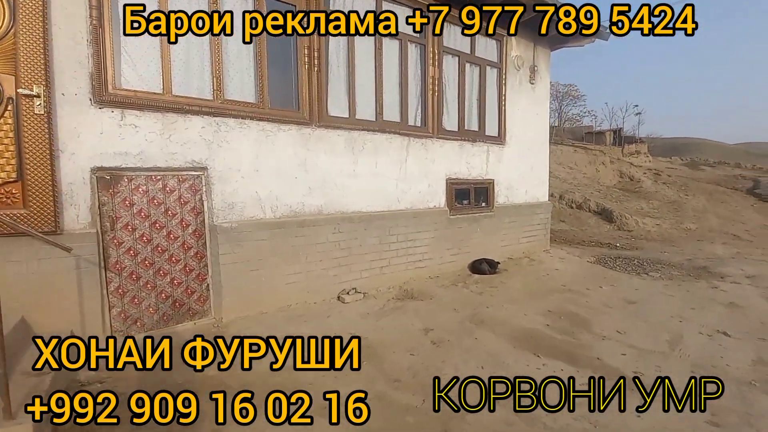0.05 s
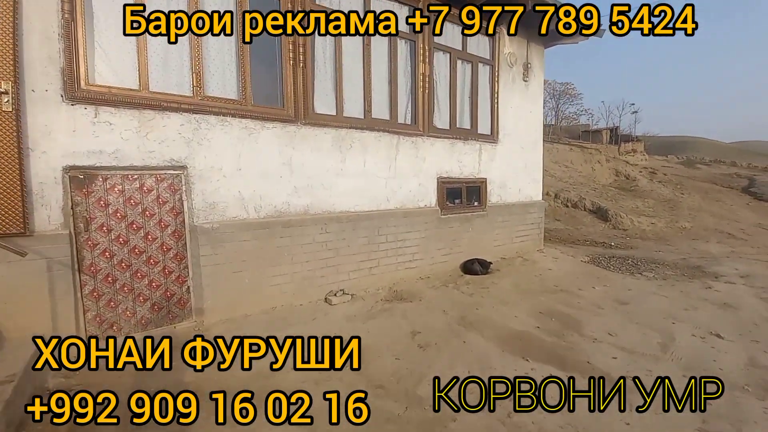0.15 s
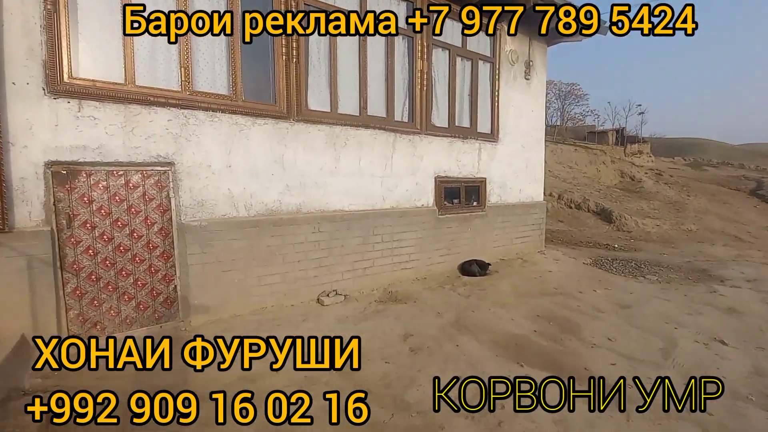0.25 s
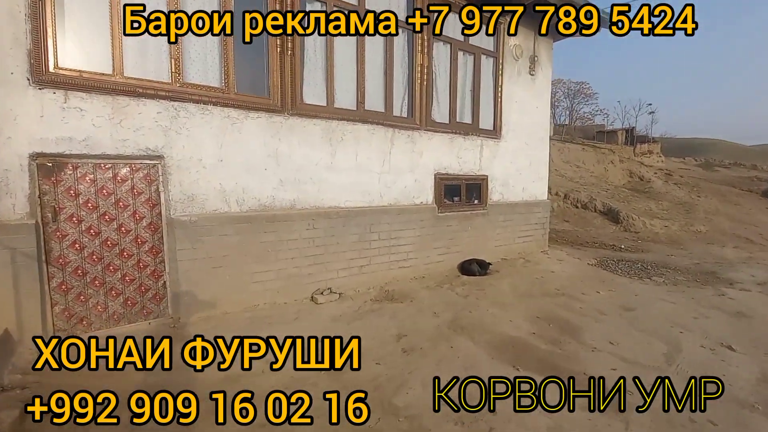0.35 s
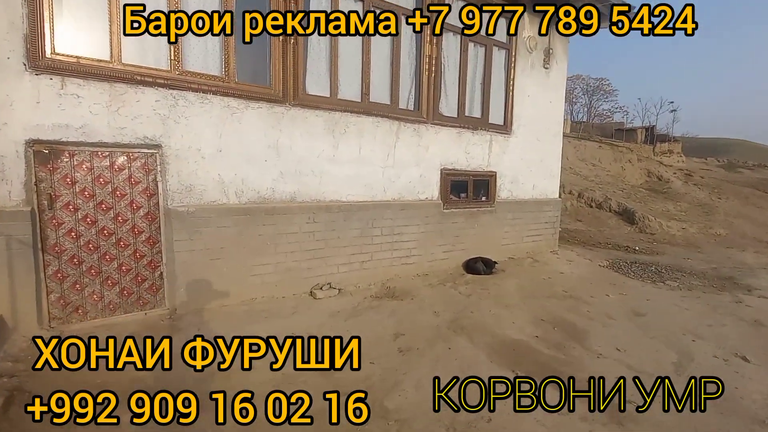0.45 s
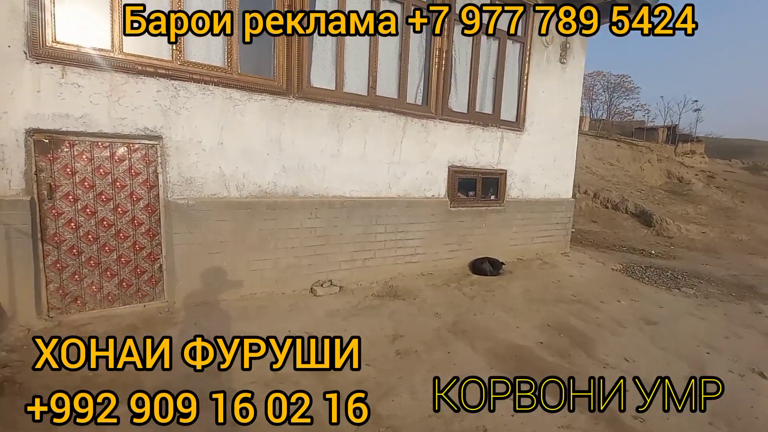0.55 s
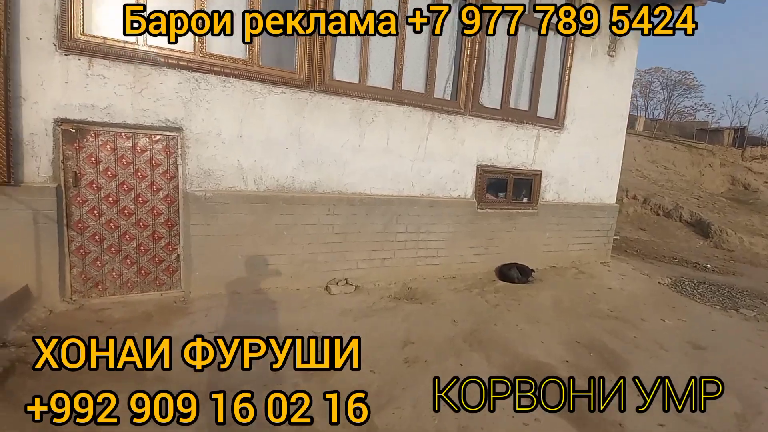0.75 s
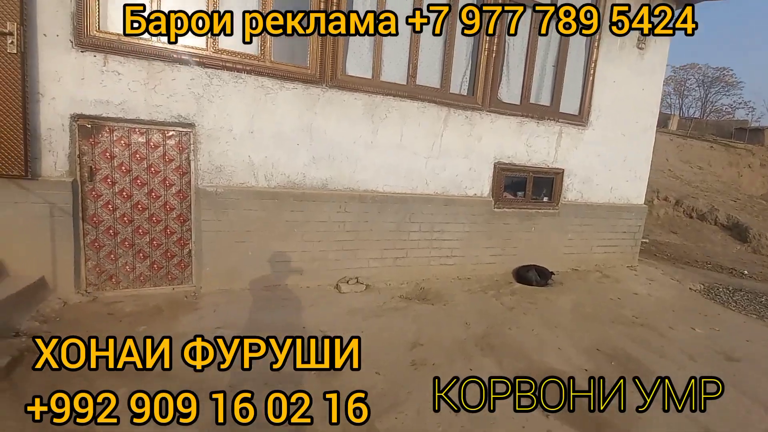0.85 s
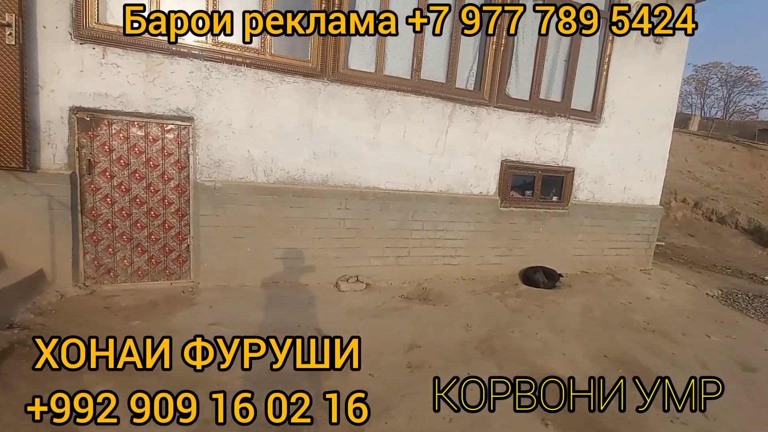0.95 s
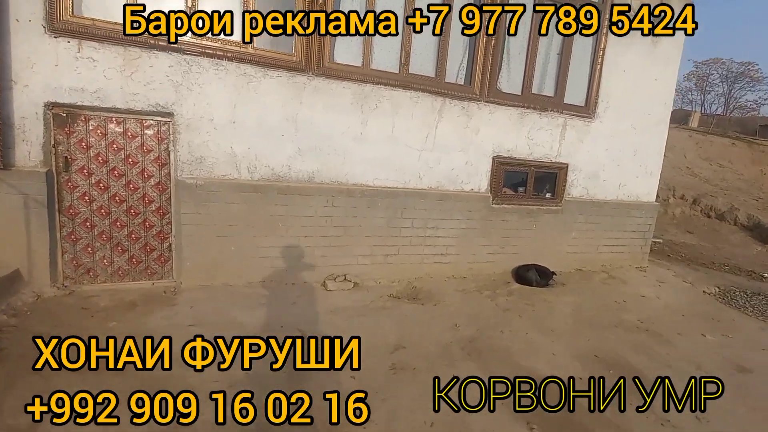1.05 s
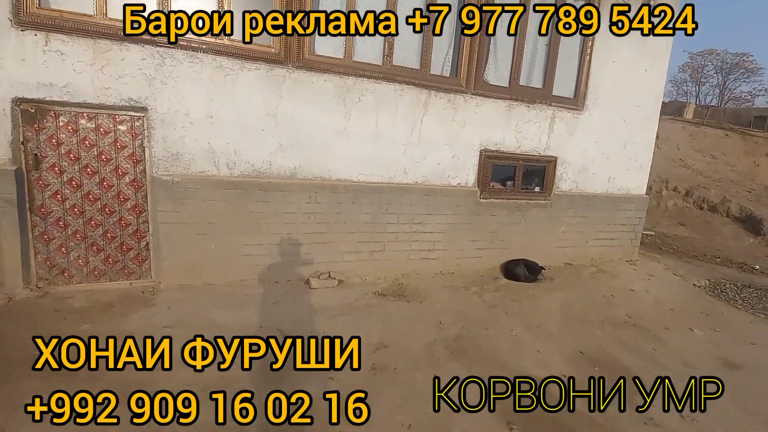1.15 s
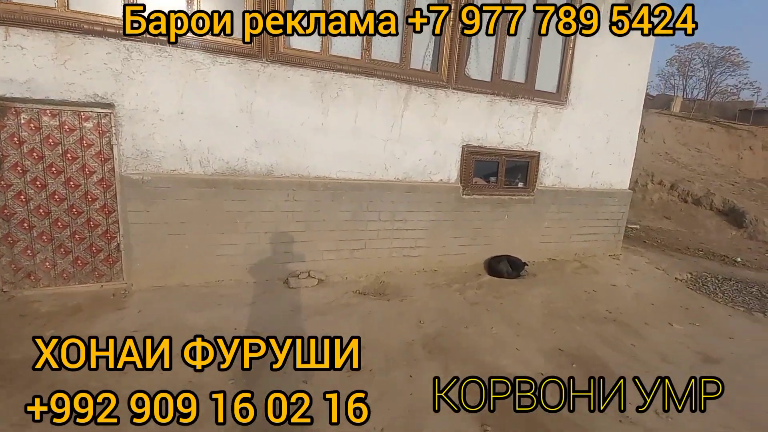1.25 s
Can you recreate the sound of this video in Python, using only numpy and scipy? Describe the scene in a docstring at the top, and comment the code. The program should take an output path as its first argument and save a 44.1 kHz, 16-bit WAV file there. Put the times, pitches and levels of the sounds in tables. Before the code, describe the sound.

Two slow, soft footsteps on packed dirt outdoors, with low muffled thuds from the jolted handheld camera

```python
"""Two slow steps on packed dirt

A quiet yard, heard through the two microphone ports of a camera in the walker's hand.
Close: dull heel knocks from decaying modes and noise, soles scuffing dust as shaped noise, grain snaps,
a dry rustle, sagging low thuds of the jolted camera and squeaks from one very high wavering tone.
Low noise makes the air rumble, mostly on the left port; far off are arching bird whistles, murmur and hiss."""
import sys
import numpy as np
from scipy import signal
from scipy.fft import rfft, irfft
from scipy.io import wavfile
from scipy.ndimage import uniform_filter1d

SR = 44100
rng = np.random.default_rng(int(sys.argv[2]) if len(sys.argv) > 2 else 0)


def master(y):
    """Save y as 16-bit WAV."""
    cut = np.clip(np.atleast_2d(y).T, -1, 1)
    pcm = np.round(cut * 32767)  # scale
    wavfile.write(sys.argv[1], SR, pcm.astype(np.int16))


N = 57330  # samples, 1.3 s

# In every table, pan_db is left over right. Colour levels are relative: each coloured noise is set to rms 1.

# Heel knocks on earth: start_s, level_db (of the crunch), decay_s (of the crunch)
HEEL_KNOCKS = [(0.310, -50, 0.036), (0.44, -48.5, .007), (0.926, -51, 0.023)]
# Spectrum of the heel crunch: frequency_hz, level_db
CRUNCH_COLOUR = [(50, -26), (110, 0), (220, 3), (330, -6), (520, -0.5), (800, -28.5), (1500, -22),
                 (2500, -44), (6000, -40), (15000, -61)]
# Dead modes of sole and earth: pitch_hz, level_db (within the thump), decay_s
SOLE_MODES = [(178.5, -4, 0.022), (267, 0, 0.0068), (506, -3.5, 0.0038)]
HEEL_ATTACK_S, HEEL_PAN_DB = 0.0023, 3
THUMP_OVER_CRUNCH_DB = 6

# Soles sliding over dust: start_s, rise_s, hold_s, release_s, level_db, pan_db
SOLE_SLIDES = [(0.065, 0.13, 0.024, 0.12, -68.5, 0.5), (0.297, .06, 0.097, 0.069, -67, 5),
               (0.594, 0.018, 0.021, 0.027, -66, 9.5), (0.763, 0.037, 0.18, 0.017, -60.5, 3),
               (0.799, .12, 0.026, 0.014, -56, .5)]
# Spectrum of the rubbing sole: frequency_hz, level_db
RUB_COLOUR = [(200, -10.5), (300, -10), (450, -13.5), (580, -1), (700, -9), (850, -10.5), (1050, -10.5),
              (1200, -3.5), (1340, 4), (1460, -4), (1750, -6.5), (2100, -18), (2650, -29.5), (4000, -38.5),
              (5800, -21), (8000, -38), (10400, -35), (12100, -29), (15500, -35.5)]
RUB_CUT_HZ, RUB_LIKENESS = 170, 0.88
GRIT_PER_S, GRIT_OVER_RUB_DB = 3100, -14.5
GRIT_SPREAD_DB = 4  # mean of the random boost of each grain

# Single grains cracking under the sole: start_s, level_db
GRAIN_TICKS = [(0.267, -65), (0.312, -62), (0.4225, -61), (0.93, -55.5), (0.943, -64), (1.018, -76),
               (1.025, -78), (1.044, -63.5)]
# Spectrum of a cracking grain: frequency_hz, level_db
GRAIN_COLOUR = [(2000, -15.5), (4000, -9), (6200, 13.5), (8500, -6.5), (12500, 2.5), (15500, -9)]
TICK_DECAY_S = 0.0023

# Level of a soft dry rustle, likely clothing: time_s, level_db
CLOTH_LEVEL = [(0, -74), (0.14, -69), (0.25, -64), (0.47, -63), (0.55, -77.5), (0.73, -74), (0.8, -71.5),
               (0.95, -76.5), (1.0, -67.5), (1.15, -67), (1.3, -64.5)]
# Spectrum of that rustle: frequency_hz, level_db
FABRIC_COLOUR = [(300, -18), (450, -7), (620, -0.5), (800, -14.5), (1050, -12), (1400, -1), (1900, -4.5),
                 (2300, -18.5), (3200, -30), (6000, -25.5), (9000, -41.5)]
CLOTH_PAN_DB = 7.5

# Thuds of the jolted camera: start_s, level_db, pitch_hz (at onset), decay_s, pan_db
CAMERA_THUDS = [(0.045, -38, 84.5, 0.0088, 15), (0.123, -36.5, 104, 0.0033, 10.5),
                (0.155, -39, 81, 0.004, -17), (0.194, -35.5, 95, 0.0068, 43), (0.234, -41, 92, 0.0055, -25),
                (0.313, -36, 109.4, 0.004, 9), (0.3576, -20.5, 140, 0.0055, 28),
                (0.392, -23, 107, 0.0038, 26), (0.421, -23.5, 183, 0.0033, 33),
                (0.452, -29.5, 144, 0.0024, 29), (0.465, -37, 87, 0.0039, -4),
                (0.501, -39.5, 126, 0.0031, 7.5), (0.62, -40, 132, 0.0038, 24),
                (0.947, -33.5, 90.6, 0.0092, 36)]
# Spectrum of the grip rustle inside a thud: frequency_hz, level_db
GRIP_COLOUR = [(120, 2.5), (200, 6), (320, -1.5), (480, -6.5), (800, -30), (2000, -60)]
THUD_REST_HZ, THUD_SAG_S = 76.8, 0.014
GRIP_OVER_THUD_DB = -24

# Tiny squeaks of the hand-held case: start_s, length_s, level_db, pan_db
CASE_SQUEAKS = [(0.268, 0.0039, -64, -20), (0.423, 0.0064, -68, -16), (0.4437, 0.01, -48.5, -10.5),
                (0.459, 0.023, -64.5, 13), (0.828, 0.027, -69.5, -27), (1.016, 0.019, -69, -3)]
SQUEAK_HZ, SQUEAK_DRIFT_HZ = 11950, 46.2  # centre and spread of the pitch
SQUEAK_ROUGHNESS = 0.21  # spread of the amplitude, as a fraction

# Level of moving air on the left port: time_s, level_db
AIR_LEVEL = [(0, -63.5), (0.05, -53), (0.11, -49), (0.29, -52.5), (0.35, -41), (0.48, -41.5), (0.55, -50),
             (0.74, -49), (0.92, -44), (1.07, -49.5), (1.11, -56), (1.3, -63.5)]
# Spectrum of the air rumble: frequency_hz, level_db
RUMBLE_COLOUR = [(25, -21), (45, -15.5), (62, -1.5), (78, -1.5), (105, -3), (160, -15.5), (260, -20.5),
                 (400, -40), (800, -44), (2000, -83)]
AIR_CUT_HZ, AIR_RIGHT_DB = 18, -16.5  # right port relative to left

# Far bird whistles: middle_s, length_s, top_pitch_hz (before waver), level_db
BIRD_WHISTLES = [(0.727, 0.077, 3070, -74), (1.237, 0.096, 3090, -82.5), (1.257, 0.085, 3900, -83)]
BIRD_ARCH_HZ, BIRD_WAVER_HZ = 378, 20
BIRD_PAN_DB = -4

# Spectrum of the open-air murmur: frequency_hz, level_db
MURMUR_COLOUR = [(88, -35), (150, -1), (179, -14), (201, -7), (230, -6), (302, -19.5), (359, -18.5),
                 (490, -43.5), (561, -15), (656, -20.5), (966, -32.5), (1200, -19.5), (1290, -22),
                 (1400, -22.5), (2020, -42), (2140, -52.5), (2980, -41), (3760, -44.5), (6600, -38),
                 (7560, -56), (15500, -51)]
MURMUR_DB, MURMUR_WALK_DB, MURMUR_PAN_DB = -68.5, 1.03, 1
MURMUR_CUT_HZ, MURMUR_LIKENESS = 218, 0.66
# Level of the high hiss: time_s, level_db
HISS_LEVEL = [(0, -75), (0.3, -73.5), (0.49, -69), (0.58, -74), (0.75, -77), (0.87, -76), (0.95, -68.5),
              (1.06, -69), (1.17, -74), (1.3, -77.5)]
# Spectrum shared by the hiss and the loose grit: frequency_hz, level_db
TREBLE_COLOUR = [(2500, -10.5), (4600, -17), (5700, -4), (6500, -0.5), (7600, -12.5), (10000, -15.5),
                 (11400, -9.5), (12200, -3), (13500, -11), (15500, -6)]

PORT_LAG_S, PORT_BLEND_HZ = 0.00013, 2640  # the lag is halved at this frequency
LOW_CUT_HZ, TOP_HZ = 42, 15850


def undb(db):
    """Decibels to gain."""
    return 10 ** (np.asarray(db) / 20)


def unit(x):
    """Scale to rms 1."""
    return x / np.sqrt(np.mean(x ** 2))


def clock():
    """Time of every sample in seconds."""
    return np.arange(N) / SR


def curve(rows):
    """Gain along a table of time_s, level_db."""
    return undb(np.interp(clock(), *np.array(rows).T))


def pan(db):
    """Left and right gains; the louder side stays at 1."""
    return undb(np.minimum([[db], [-db]], 0))


def colour(x, points, cut_hz=20):
    """Give a signal a spectrum of frequency_hz, level_db points with a steep low cut, at rms 1."""
    f = np.arange(N // 2 + 1) * SR / N + 0.0011  # the offset avoids log(0)
    hz, db = np.array(points).T
    shape = undb(np.interp(np.log(f), np.log(hz), db))
    low_cut = np.hypot(1, np.square(np.square(cut_hz / f)))
    return unit(irfft(rfft(x) * shape / low_cut, N))


def pair(likeness):
    """Left and right noise that share this fraction of their power."""
    c = np.clip(likeness, 0, 1)
    shared = np.sqrt(c) * rng.standard_normal(N)
    return shared + np.sqrt(1 - c) * rng.standard_normal((2, N))


def walk(rate):
    """Slow chance with a spread of 1: random values held at this rate in Hz, then smoothed twice."""
    k = max(int(SR / rate), 1)
    held = rng.standard_normal(N)[np.arange(N) // k]
    return unit(uniform_filter1d(uniform_filter1d(held, k), k))


def heels():
    """A heel meets hard earth: dead modes give a dull thump, decaying noise a short crunch."""
    crunch = colour(pair(1.0), CRUNCH_COLOUR)
    out = 0
    for start, db, decay in HEEL_KNOCKS:
        age = np.maximum(clock() - start, 0)
        thump = 0
        for hz, mode_db, ring in SOLE_MODES:
            thump = thump + undb(mode_db) * np.sin(2 * np.pi * hz * age) * np.exp(-age / ring)
        attack = np.minimum(age / HEEL_ATTACK_S, 1)
        knock = crunch * np.exp(-age / decay) + undb(THUMP_OVER_CRUNCH_DB) * thump
        out = out + undb(db) * attack * knock
    return out * pan(HEEL_PAN_DB)


def scuffs():
    """A sole rubs harder, slides and stops; loose grains tick under it."""
    rub = colour(pair(RUB_LIKENESS), RUB_COLOUR, RUB_CUT_HZ) * undb(0.87 * walk(70.6))
    struck = rng.random(N) < GRIT_PER_S / SR
    boost = undb(GRIT_SPREAD_DB * rng.exponential(size=N))
    grains = struck * rng.standard_normal((2, N)) * boost
    sound = rub + undb(GRIT_OVER_RUB_DB) * colour(grains, TREBLE_COLOUR)
    power = 0  # overlapping slides add in power
    for start, rise, hold, release, db, side_db in SOLE_SLIDES:
        age = clock() - start
        swell = np.clip(age / rise, 0, 1)
        fade = np.exp(-np.maximum(age - rise - hold, 0) / release)
        power = power + (undb(db) * pan(side_db) * swell * fade) ** 2
    return sound * np.sqrt(power)


def ticks():
    """Bright snaps of single grains: noise that starts at once and dies exponentially."""
    env = 0
    for start, db in GRAIN_TICKS:
        age = clock() - start
        env = env + undb(db) * (age > 0) * np.exp(-np.abs(age) / TICK_DECAY_S)
    return colour(pair(0.15), GRAIN_COLOUR) * env


def cloth():
    """Soft dry rustle, likely clothing: fluttering noise swells and sinks along its level table."""
    rustle = colour(pair(0.48), FABRIC_COLOUR, 370)
    return rustle * curve(CLOTH_LEVEL) * undb(2.13 * walk(50)) * pan(CLOTH_PAN_DB)


def thuds():
    """Each jolt swells and dies as a low tone moving to a rest pitch, with a muffled rustle of the grip."""
    out = np.zeros((2, N))
    rustle = undb(GRIP_OVER_THUD_DB) * colour(rng.standard_normal(N), GRIP_COLOUR, 86)
    for start, db, hz, decay, side_db in CAMERA_THUDS:
        age = np.maximum(clock() - start, 0)
        pitch = THUD_REST_HZ + (hz - THUD_REST_HZ) * np.exp(-age / THUD_SAG_S)
        tone = np.sin(2 * np.pi * np.cumsum(pitch * (age > 0)) / SR)
        env = (age / (2 * decay)) ** 2 * np.exp(2 - age / decay)  # peaks at 1 after two decay times
        out += undb(db) * pan(side_db) * env * (tone + rustle)
    return out


def squeaks():
    """Brief slips excite one very high, slightly rough resonance."""
    pitch = SQUEAK_HZ + SQUEAK_DRIFT_HZ * walk(900)
    tone = np.sin(2 * np.pi * np.cumsum(pitch) / SR)
    tone = unit(tone * (1 + SQUEAK_ROUGHNESS * walk(500)))
    env = 0
    for start, length, db, side_db in CASE_SQUEAKS:
        swell = np.sin(np.pi * np.clip((clock() - start) / length, 0, 1))
        env = env + undb(db) * pan(side_db) * swell
    return tone * env


def air():
    """Eddies rumble on each port separately, evened out over a few cycles."""
    eddies = colour(rng.standard_normal((2, N)), RUMBLE_COLOUR, AIR_CUT_HZ)
    eddies = eddies / np.sqrt(uniform_filter1d(eddies ** 2, size=1500))  # 34 ms window
    return eddies * curve(AIR_LEVEL) * undb([[0], [AIR_RIGHT_DB]])


def bird():
    """Far whistles whose wavering pitch arches up and down."""
    out, waver = 0, BIRD_WAVER_HZ * walk(250)
    for middle, length, hz, db in BIRD_WHISTLES:
        u = np.clip(2 * (clock() - middle) / length, -1, 1)  # -1 at the start, 1 at the end
        pitch = hz + waver - BIRD_ARCH_HZ * u ** 2
        whistle = np.sin(2 * np.pi * np.cumsum(pitch) / SR)
        out = out + whistle * np.cos(np.pi * u / 2) ** 2 * undb(db)
    return out * pan(BIRD_PAN_DB)


def yard():
    """Faint open-air murmur of the surroundings under a thin hiss of changing level."""
    murmur = colour(pair(MURMUR_LIKENESS), MURMUR_COLOUR, MURMUR_CUT_HZ)
    murmur = murmur * undb(MURMUR_DB + MURMUR_WALK_DB * walk(12.17)) * pan(MURMUR_PAN_DB)
    hiss = colour(pair(0.067), TREBLE_COLOUR) * curve(HISS_LEVEL)
    return murmur + hiss


def ports(x):
    """Airborne sound reaches the left port slightly later; the lag fades out in the treble."""
    f = np.arange(N // 2 + 1) * SR / N
    lag = PORT_LAG_S / (1 + np.square(np.square(f / PORT_BLEND_HZ)))
    left = irfft(rfft(x[0]) * np.exp(-2j * np.pi * f * lag), N)
    return np.array([left, x[1]])


def scene():
    """Steps, clothing, camera noises, air, bird and yard together."""
    airborne = ports(heels() + scuffs() + cloth() + yard())
    return airborne + ticks() + thuds() + squeaks() + air() + bird()


def record(dry):
    """The recorder drops the deepest bass and cuts the top steeply."""
    low_cut = signal.butter(4, LOW_CUT_HZ, "high", fs=SR, output="sos")
    top_cut = signal.ellip(10, .2, 70, TOP_HZ, fs=SR, output="sos")  # ripple, stopband in dB
    return signal.sosfilt(top_cut, signal.sosfilt(low_cut, dry))


dry = scene()
out = record(dry)
master(out)
```